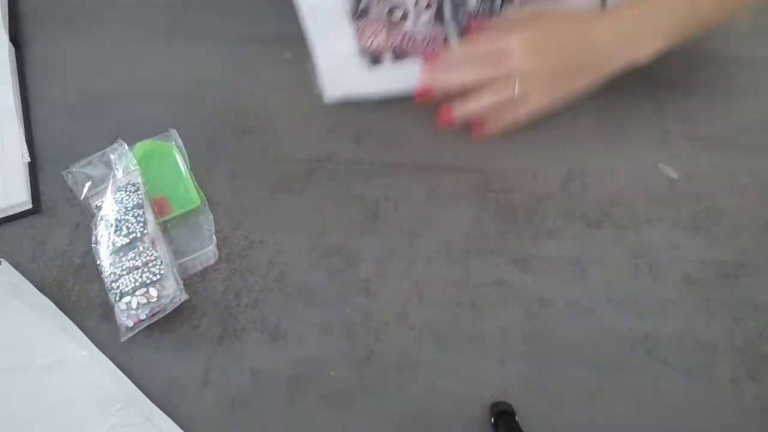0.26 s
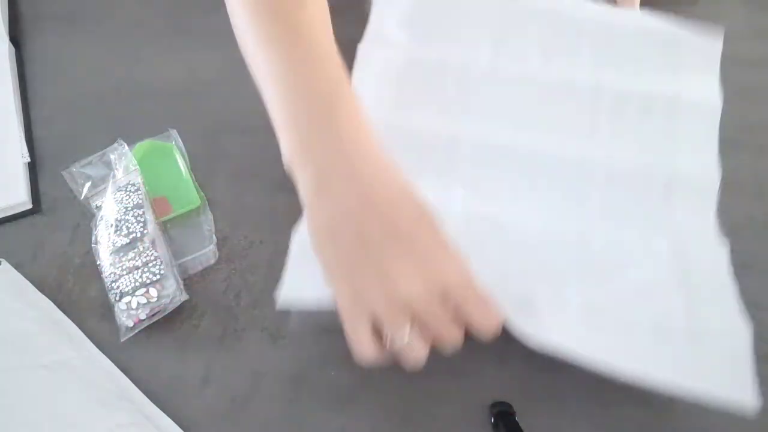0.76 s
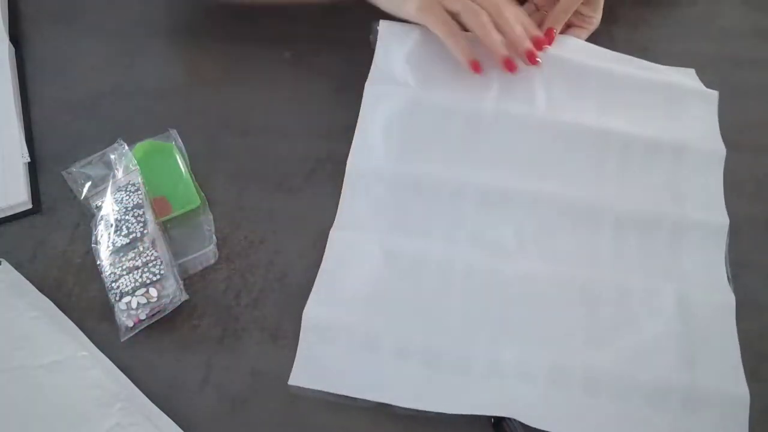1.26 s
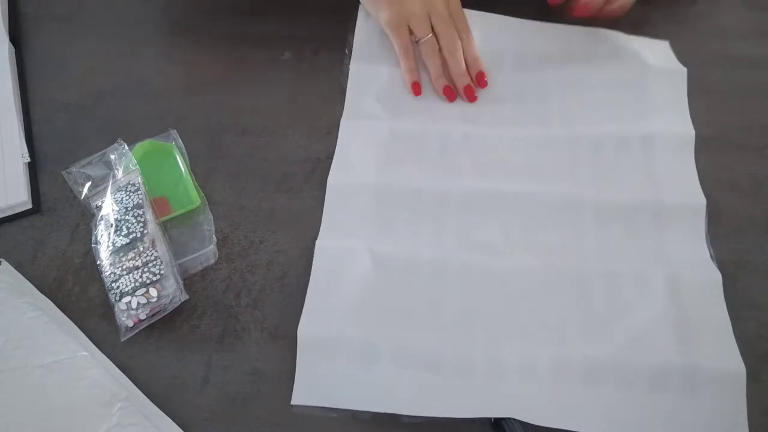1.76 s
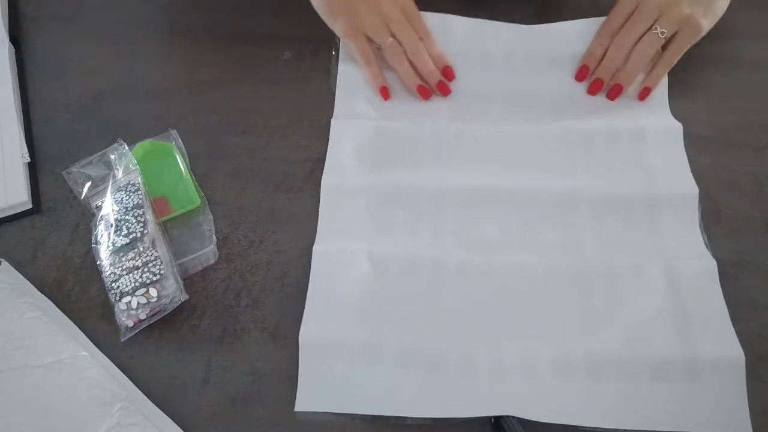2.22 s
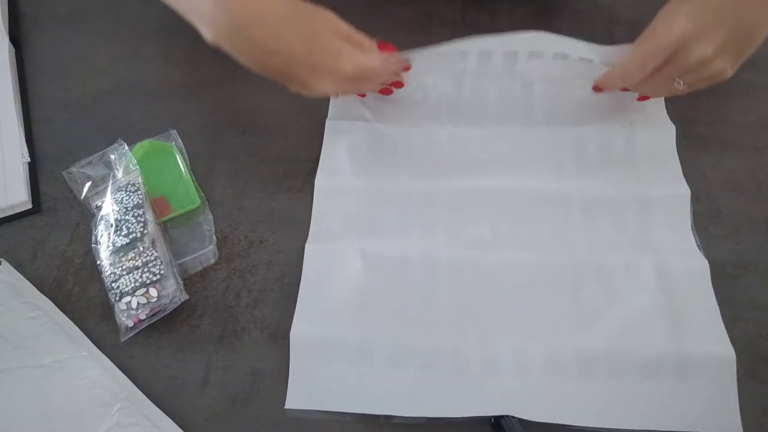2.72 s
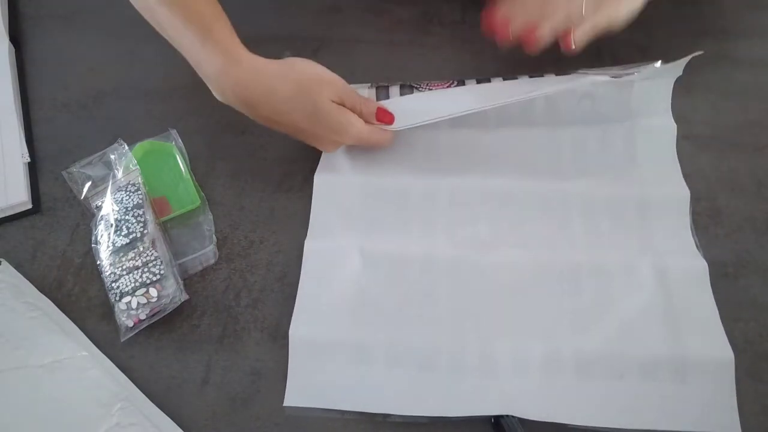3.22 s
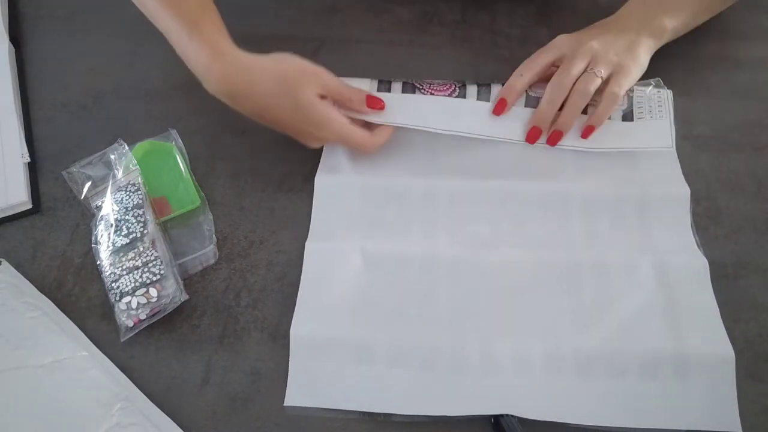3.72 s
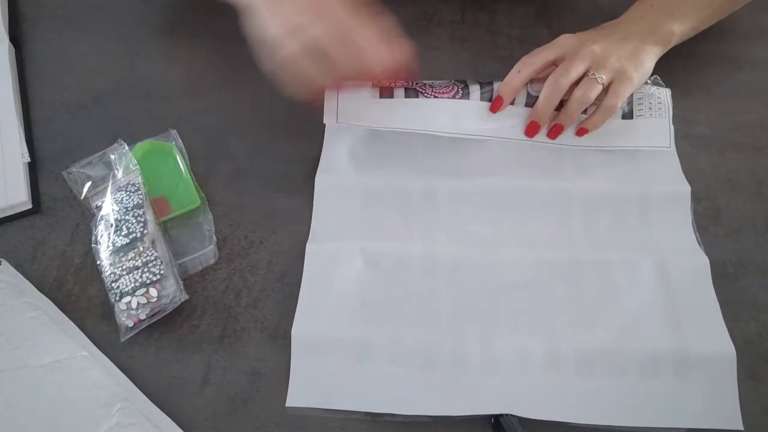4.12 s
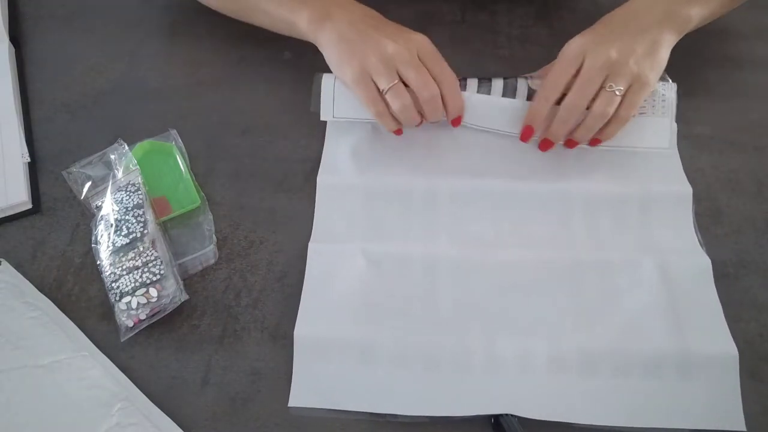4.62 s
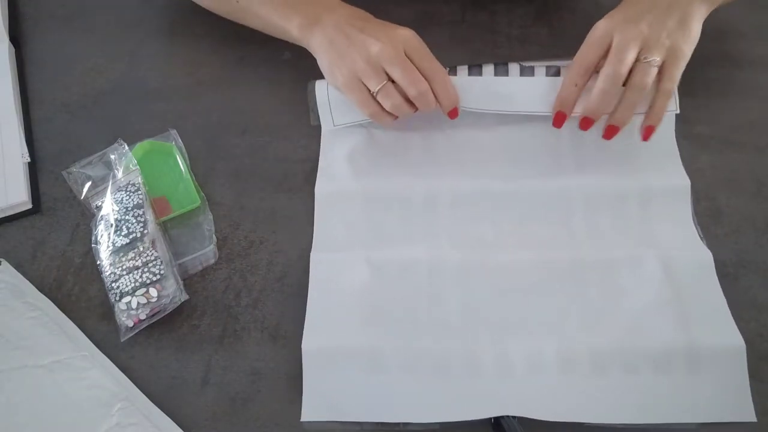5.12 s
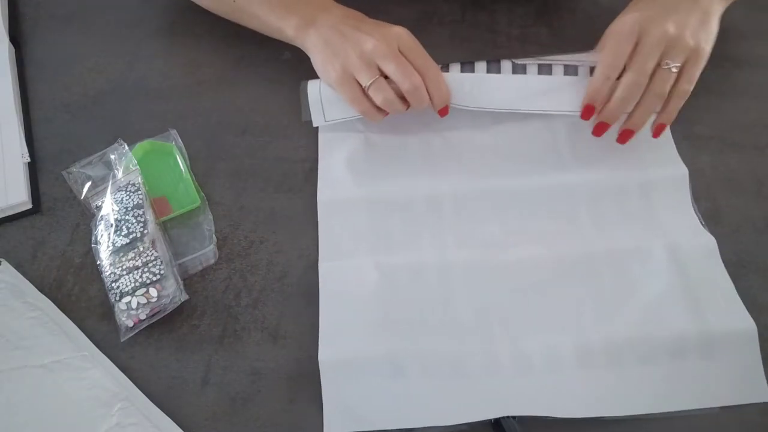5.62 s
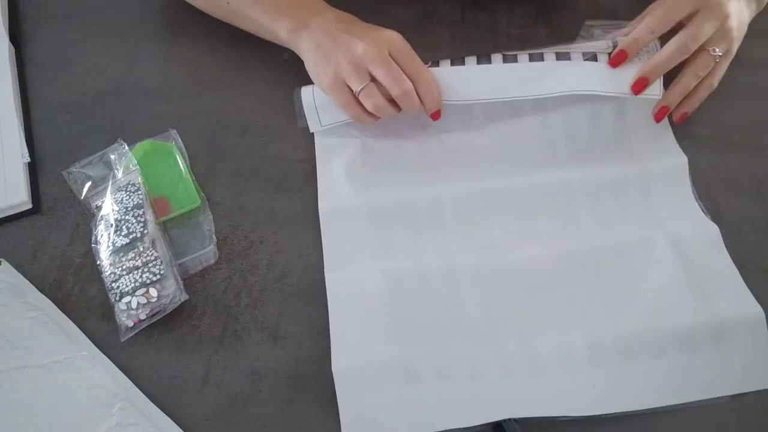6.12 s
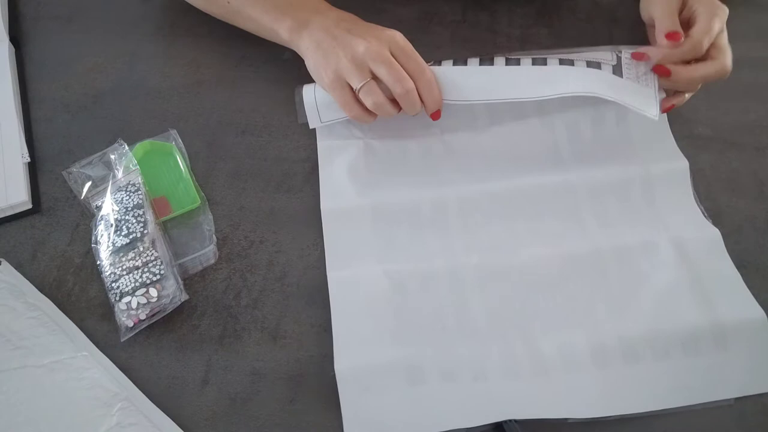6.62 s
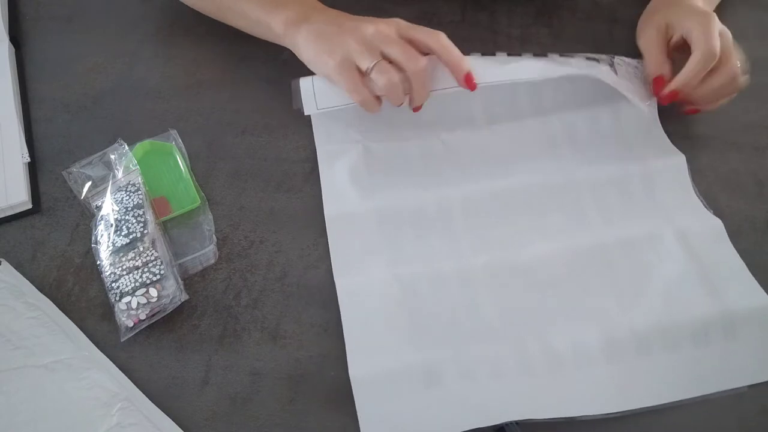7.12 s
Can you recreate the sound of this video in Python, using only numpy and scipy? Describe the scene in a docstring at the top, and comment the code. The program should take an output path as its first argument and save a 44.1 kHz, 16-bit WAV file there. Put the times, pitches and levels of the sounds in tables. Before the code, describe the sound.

A stiff canvas sheet under thin plastic film is handled on a table in a quiet room. It swishes and buckles as it is turned over, then is smoothed with short rubs and scattered crinkles. Film snaps multiply as the edge is rolled, growing sharpest and densest near the end. Two close microphones, bright and dry, with a faint low room murmur.

```python
"""A quiet room: two hands slide, flatten and roll a stiff canvas sheet under a plastic film on a table.
Creases snap as noise bursts around a tick; the film crackles as random grains; rubbing is friction noise.
Air under the sheet resounds as narrow noise bands, knocks add brief sines, and bumps ring the table's modes.
Two close microphone ports hear direct sound, echoes and a low room murmur;
the left port has a sharp treble resonance, the right one a treble dip."""
import sys
import numpy as np
from scipy import signal
from scipy.fft import rfft, irfft
from scipy.io import wavfile

SR = 44100
rng = np.random.default_rng(int(sys.argv[2]) if len(sys.argv) > 2 else 0)


def inscribe(sig):
    """Save sig as 16-bit PCM at rate SR to the path in sys.argv[1].

    A 1-D sig is mono; a 2-D sig holds one channel per row.
    Samples are clipped to [-1, 1] before scaling.
    """
    pcm = np.round(np.clip(np.atleast_2d(sig).T, -1, 1) * 32767)
    wavfile.write(sys.argv[1], SR, pcm.astype(np.int16))


N = 324576   # samples

# radiating bands, in order canvas, low paper, high paper, film: low_hz, high_hz
SHEET_BANDS = [(350, 1200), (1200, 2800), (2800, 6500), (6500, 17500)]
# places on the sheet, as the lead of the right port over the left: lead_samples
SHEET_PLACES = [6, 2.5, -1.5, 6, 4, -1.5]
# the canvas flexes and drags: time_s, level_db (relative)
CANVAS_FLEX = [(0, -54.5), (.28, -67), (.56, -57.5), (.9, -52), (1.2, -63), (1.35, -62), (1.64, -50),
               (1.82, -68.5), (2.02, -55), (2.33, -67), (2.48, -50.5), (2.8, -74), (3.07, -58), (3.22, -90),
               (3.3, -63.5), (3.5, -56.5), (3.67, -68), (4.04, -51), (4.28, -84), (4.5, -57), (4.68, -53.5),
               (5.25, -70), (5.4, -56), (5.7, -67.5), (6.05, -65), (6.25, -64), (6.46, -56), (6.83, -50),
               (7.13, -49), (7.26, -68), (7.36, -60)]
# the canvas buckles: start_s, level_db (relative), pitch_hz, ring_db (ring against level_db)
CANVAS_KNOCKS = [(0.063, -40, 750, -6), (0.141, -31, 1626, -0.5), (0.347, -43, 1280, -9),
                 (0.8, -38.5, 920, 1), (0.857, -32.5, 920, -2), (0.908, -34.5, 1930, -2),
                 (0.929, -28, 890, -6), (0.972, -32, 880, -13), (1.133, -35.5, 885, 3.5),
                 (1.552, -32, 1870, -8), (1.617, -40, 970, 5), (1.851, -32, 403, -5.5),
                 (1.982, -50, 1200, -6), (1.998, -24.5, 1860, -4), (2.166, -38, 1280, -10),
                 (2.744, -32.5, 1710, -4.5), (2.837, -37, 1750, -1), (2.933, -36, 470, -4),
                 (3.276, -27.5, 1860, -1.5), (3.39, -47, 2090, -4), (3.469, -36.5, 770, 0),
                 (3.588, -42.5, 896, -1), (3.847, -42, 1220, -1), (3.899, -38, 711, -8),
                 (3.974, -49, 1490, -6), (4.061, -36, 1460, -6), (4.123, -35, 2300, 1),
                 (4.193, -34.5, 970, -5), (4.334, -37, 940, -1), (4.429, -47, 925, 1),
                 (4.462, -38.5, 1020, 1), (4.481, -33.5, 930, -1), (4.568, -39.5, 1460, -4),
                 (4.656, -34.5, 930, -6), (4.962, -33.5, 1680, -13), (5.008, -39.5, 1730, -6),
                 (5.092, -38, 970, -6), (5.309, -42.5, 934, -9), (5.373, -35.5, 2180, 0),
                 (5.392, -29, 1280, -10), (5.55, -45, 1730, -12), (5.587, -30.5, 2560, -11),
                 (5.764, -38, 794, -2.5), (5.956, -39.5, 1290, -6), (6.294, -46, 746, -2),
                 (6.427, -28.5, 740, -11), (6.45, -27.5, 1510, -13), (6.559, -39, 581, -8),
                 (6.583, -25.5, 2260, -3), (6.919, -35, 974, -13), (6.978, -29, 727, -6),
                 (7.082, -32, 920, -12), (7.138, -26.5, 950, -5.5), (7.232, -28, 2690, -1.5),
                 (7.327, -22, 2750, -0.5)]


def amp(db):
    """Level law: decibels to amplitude ratio."""
    return 10 ** (np.asarray(db) / 20)


def rms_one(x):
    """Normalisation: scale to a root mean square of 1."""
    return x / np.sqrt(np.mean(x ** 2) + 1e-20)


def drift(rate_hz):
    """Low-passed noise: two equal one-pole filters leave a slow random wander of rms 1."""
    r = np.exp(-2 * np.pi * rate_hz / SR)
    noise = rng.standard_normal(N + SR)
    settled = signal.lfilter([1], [1, -2 * r, r * r], noise)[SR:]
    return rms_one(settled)


def band(x, low_hz, high_hz):
    """Band-pass filtering, with a gain that keeps white noise at its rms."""
    sos = signal.butter(2, [low_hz, high_hz], "band", fs=SR, output="sos")
    return signal.sosfilt(sos, x) * np.sqrt(SR / 2 / (high_hz - low_hz))


def colour(x, peaks):
    """Resonance and anti-resonance: second-order sections in series raise or lower regions of the spectrum."""
    for hz, width_hz, db in peaks:
        a = amp(db / 2)
        w = 2 * np.pi * hz / SR
        k = np.tan(np.pi * width_hz / SR)
        numerator = [1 + k * a, -2 * np.cos(w), 1 - k * a]
        denominator = [1 + k / a, -2 * np.cos(w), 1 - k / a]
        x = signal.lfilter(numerator, denominator, x)
    return x


def room_tone(alike):
    """Partly coherent noise: the steady low murmur of the building, with correlation alike between ports."""
    # spectrum of the murmur: frequency_hz, density_db (relative, per Hz)
    murmur = np.array([(15, -22), (27, -6.5), (79, -3.5), (130, -5), (250, -6.5), (420, -12.5),
                       (900, -21.5), (5000, -23.5), (9000, -39)])
    level_db = -62   # rms before the ports colour it
    hz = np.fft.rfftfreq(N, 1 / SR) + 1   # the offset avoids log 0
    gain = amp(np.interp(np.log(hz), np.log(murmur[:, 0]), murmur[:, 1]))
    mid, side = irfft(rfft(rng.standard_normal((2, N))) * gain, N)
    ports = np.sqrt(1 + alike) * mid + np.sqrt(1 - alike) * side * [[1], [-1]]
    return amp(level_db) * rms_one(ports)


def handling():
    """Excitation by the hands: the relative level of each band in time, linear in dB between points."""
    # hands working the sheet: time_s, film_db (crackle), scrape_db (low paper), both relative
    work = [(0, -45, -38), (.07, -55, -55.5), (.16, -38, -49.5), (.28, -61, -66), (.48, -44, -58),
            (.56, -52.5, -59.5), (.71, -46, -50.5), (.83, -52.5, -61), (.95, -51.5, -52), (1.07, -44, -48),
            (1.14, -53, -60), (1.23, -46, -47.5), (1.35, -62, -64.5), (1.45, -46, -49),
            (1.57, -48.5, -50.5), (1.642, -41.5, -38.5), (1.81, -66, -66.5), (1.86, -60, -58),
            (1.95, -62, -68), (2.02, -44.5, -47), (2.14, -51.5, -55), (2.19, -43.5, -42),
            (2.33, -51.5, -58), (2.478, -47, -43.5), (2.71, -61, -68), (2.81, -61.5, -62),
            (2.87, -50.5, -50), (3.07, -52, -65), (3.23, -71, -61), (3.3, -56, -69), (3.37, -54.5, -56.5),
            (3.5, -54.5, -53.5), (3.65, -54, -62), (3.7, -48.5, -59), (4.04, -46.5, -48),
            (4.18, -51.5, -55), (4.29, -66, -70), (4.42, -55, -57.5), (4.48, -59.5, -50),
            (4.62, -54, -58.5), (4.67, -55, -47.5), (4.86, -50, -59.5), (5, -48, -55.5), (5.25, -64, -61),
            (5.4, -37, -52.5), (5.52, -69, -61.5), (5.59, -53, -56), (5.74, -55, -54.5), (5.91, -55.5, -67),
            (6.03, -50, -63), (6.14, -58, -55), (6.26, -64, -72), (6.32, -49, -66), (6.39, -51, -69),
            (6.46, -28.5, -44.5), (6.54, -45, -70), (6.68, -39.5, -45.5), (6.74, -47, -61.5),
            (6.83, -38.5, -48), (6.9, -41.5, -55), (7.031, -47, -53), (7.13, -39, -51),
            (7.25, -41.5, -48.5), (7.3, -47.5, -54.5), (7.36, -44, -49)]
    film_share = 0.49   # the high paper hiss lies between film and scrape
    t = np.arange(N) / SR
    s, film_db, scrape_db = np.transpose(work)
    hiss_db = film_share * film_db + (1 - film_share) * scrape_db
    canvas = np.interp(t, *np.transpose(CANVAS_FLEX))
    others = [np.interp(t, s, level_db) for level_db in (scrape_db, hiss_db, film_db)]
    return np.array([canvas] + others)


def rustle(grains_per_s, spread_db, smooth, clump_db):
    """Stick-slip friction: clumped tiny slips over smooth rubbing noise; places x bands x N.

    The grain rate holds where the clumping gain is 1."""
    # radiated share of each band: trim_db
    radiated = np.array([-3, -2, -2.5, -5.5])
    out = np.zeros((len(SHEET_PLACES), len(SHEET_BANDS), N))
    share = np.array(smooth)[:, None]   # the canvas mostly rubs, the film mostly crackles
    together = drift(30)
    for k in range(len(SHEET_PLACES)):
        clump = amp(clump_db * (0.83 * together + drift(20)))
        born = rng.random(N) < grains_per_s * clump / SR
        sizes = amp(spread_db * np.minimum(rng.exponential(1, N), 4))
        grains = rms_one(born * sizes * rng.choice([-1, 1], N))
        friction = rms_one(clump * rng.standard_normal(N))
        patches = amp(3.2 * np.array([drift(9) for edges in SHEET_BANDS]))   # each band swells on its own
        out[k] = share * patches * friction + np.sqrt(1 - share ** 2) * grains
    return out * amp(handling() + radiated[:, None]) / np.sqrt(len(SHEET_PLACES))


def creases():
    """Spectra of buckling: film snaps and canvas knocks as rows of start_s, a level_db per band, t60_s."""
    # the film snaps: start_s, film_db, tick_db (paper under it), both relative
    film_snaps = [(0.0643, -29, -66), (0.0904, -29, -48), (0.1246, -31, -41), (0.1441, -26, -36),
                  (0.314, -37, -48.5), (0.3481, -34, -48.5), (0.409, -24.5, -65), (0.435, -27.5, -64),
                  (0.4574, -29, -47), (0.557, -33, -70), (0.6414, -30, -60), (0.8608, -31, -38.5),
                  (0.9146, -28.5, -45), (0.9972, -30, -42.5), (1.8527, -27, -51.5), (1.941, -49, -52.5),
                  (1.9806, -27.5, -60), (2.0055, -36, -36.5), (2.0176, -25, -35), (2.069, -31, -45),
                  (2.1685, -23, -49), (2.1842, -28, -40), (2.365, -25.5, -45), (2.3774, -25.5, -49),
                  (2.587, -27, -49), (2.6565, -35, -49), (2.838, -44, -37.5), (2.933, -51, -45),
                  (3.0058, -31.5, -47.5), (3.0839, -41, -46), (3.2783, -29, -38.5), (3.3395, -32, -60),
                  (3.4281, -18, -36), (3.512, -23.5, -50), (3.5936, -38, -46.5), (3.6192, -32, -51),
                  (3.6652, -31, -52), (3.7166, -30, -42.5), (3.7574, -26, -37), (3.8146, -32, -40),
                  (3.9077, -24, -42.5), (3.9523, -19, -42.5), (3.967, -32, -48), (4.0514, -25, -44),
                  (4.0671, -24, -45), (4.1239, -24, -38.5), (4.1923, -34, -43), (4.335, -31, -53),
                  (4.463, -35, -37), (4.4964, -23, -47), (4.5686, -23.5, -45), (4.6054, -30, -48),
                  (4.6165, -28, -62), (4.652, -25, -42.5), (4.7666, -29, -50), (4.812, -52, -45),
                  (4.84, -29.5, -56), (4.9076, -26.5, -45), (4.962, -30.5, -43.5), (5.2803, -41, -48),
                  (5.3153, -38, -42.5), (5.3742, -27, -52), (5.4106, -17, -42.5), (5.5842, -28.5, -47),
                  (5.6575, -21, -45), (5.7394, -31, -57), (5.7635, -25, -40.5), (5.8302, -27.5, -46.5),
                  (5.8863, -33, -47.5), (5.9312, -30.5, -57), (6.0396, -43, -53), (6.057, -37, -60),
                  (6.1529, -54, -44), (6.215, -39, -69), (6.2964, -23, -46.5), (6.3046, -17, -42),
                  (6.3294, -32, -49), (6.381, -54.5, -45), (6.408, -30, -50), (6.427, -37, -41),
                  (6.4504, -17.5, -34), (6.5106, -20.5, -49), (6.559, -32, -43.5), (6.5786, -25, -46),
                  (6.5853, -13, -32.5), (6.6148, -36, -44), (6.6384, -16.5, -55), (6.6615, -26, -38),
                  (6.6771, -16.5, -37.5), (6.6903, -17.5, -36), (6.7582, -38, -42), (6.773, -22, -47),
                  (6.785, -21, -45), (6.811, -27, -48), (6.8294, -18, -38), (6.8527, -27, -54),
                  (6.9261, -24, -42.5), (6.9352, -21, -41), (6.98, -18.5, -51), (7.0986, -24, -39),
                  (7.1397, -19.5, -58), (7.1944, -45, -64), (7.235, -16.5, -48), (7.319, -32, -59),
                  (7.3307, -32, -53)]
    film_trim_db, film_t60_s = -16, 0.02
    tick_trim_db = 0.5 - 11 * np.array([2, 1, 0])   # canvas, low and high paper: 11 dB less per band down
    knock_trim_db, knock_t60_s = -10.5, 0.026
    fall_db_per_octave = 7   # away from the knock's pitch
    centres_hz = np.sqrt(np.prod(SHEET_BANDS, axis=1))
    rows = []
    for s, film_db, tick_db in film_snaps:
        rows.append((s, *(tick_db + tick_trim_db), film_db + film_trim_db, film_t60_s))
    for s, db, pitch_hz, ring_db in CANVAS_KNOCKS:
        octaves_away = np.abs(np.log2(centres_hz / pitch_hz))
        rows.append((s, *(db + knock_trim_db - fall_db_per_octave * octaves_away), knock_t60_s))
    return rows


def snaps(tick, creak_s):
    """Sudden release of strain: a crease creaks, lets go with a tick, sprays smaller slips; places x bands x N."""
    length, lead_in = 4096, 256   # samples of each burst, and of them before the tick
    out = np.zeros((len(SHEET_PLACES), len(SHEET_BANDS), N + length))
    t = (np.arange(length) - lead_in) / SR
    for s, *levels_db, t60_s in creases():
        envelope = np.where(t < 0, np.exp(t / creak_s), amp(-60 * t / t60_s))
        burst = rng.standard_normal(length) ** 3 / 4 * envelope   # few strong slips, many weak ones
        burst[lead_in] = tick
        burst *= np.sqrt(.008 * SR / np.sum(burst ** 2))   # energy of unit rms over 8 ms
        at = round(s * SR)
        place = rng.integers(len(SHEET_PLACES))
        out[place, :, at:at + length] += amp(levels_db)[:, None] * burst
    return out[..., lead_in:N + lead_in]


def hollow():
    """Cavity resonance: rubbing noise in the air under the lifted sheet, and a decaying sine for each knock."""
    # the air pocket resounds: time_s, level_db (relative)
    pocket_level = [(0, -85), (.45, -91), (.57, -64), (.7, -56.5), (.85, -50.5), (1.0, -63), (1.2, -65),
                    (1.35, -60), (1.45, -62.5), (1.65, -71), (1.78, -90), (3.95, -87), (4.2, -60),
                    (4.3, -60.5), (4.5, -68), (4.72, -58), (4.9, -77), (6.5, -95), (6.85, -83),
                    (7.15, -47.5), (7.36, -75)]
    # resonances of the pocket: centre_hz, width_hz, gain_db
    pocket_modes = [(740, 130, -8.5), (940, 120, -3)]
    ring_t60_s = .03
    rings, t = np.zeros(N + 4096), np.arange(4096) / SR
    for s, db, pitch_hz, ring_db in CANVAS_KNOCKS:
        decay = amp(db + ring_db - 60 * t / ring_t60_s)
        rings[round(s * SR):][:4096] += decay * np.sin(2 * np.pi * pitch_hz * t)
    level = amp(np.interp(np.arange(N) / SR, *np.transpose(pocket_level)))
    air = np.zeros(N)
    for hz, width_hz, db in pocket_modes:
        noise = band(rng.standard_normal(N), hz - width_hz / 2, hz + width_hz / 2)
        air += amp(db + 4.8 * drift(25)) * noise
    return rings[:N] + level * air


def bumps():
    """Modal vibration: pushes ring the table top, harder ones favour upper modes; the dragged canvas shakes it."""
    # hands on the table: start_s, level_db (relative), hardness_db_per_octave
    pushes = [(0.423, -54.5, -10), (0.631, -53, -5), (1.393, -47.5, -4), (1.609, -55.5, -13),
              (1.701, -50.5, -1), (1.842, -52.5, -5), (4.387, -57, -3), (4.462, -51.5, -1.5),
              (4.681, -44.5, -3), (4.87, -63, 3), (5.378, -52, -1.5), (6.574, -63, -18), (6.778, -64, 13)]
    # modes of the table top: frequency_hz, level_db (relative), t60_s
    table_modes = [(77.3, -1.5, 0.41), (109, 1, 0.25), (151, 2, 0.14), (217.4, 7, 0.23), (322, 3.5, 0.06),
                   (410, 3, 0.3)]
    s, push_db, hardness = np.transpose(pushes)
    drag_db = np.interp(np.arange(N) / SR, *np.transpose(CANVAS_FLEX)) - 53.5
    drag = amp(drag_db) * rng.standard_normal(N)
    out = np.zeros(N)
    for hz, level_db, t60_s in table_modes:
        force = amp(level_db) * drag
        force[(s * SR).astype(int)] += amp(push_db + level_db - 9 + hardness * np.log2(hz / 150))
        r = amp(-60 / (t60_s * SR))   # decay per sample
        w = 2 * np.pi * hz / SR
        out += signal.lfilter([0, np.sin(w)], [1, -2 * r * np.cos(w), r * r], force)
    return out


def echoes(lead, near_db, near_t60, room_db, room_t60, alike_hz):
    """Reverberation: direct sound, quick echoes off table and hands, a room tail; the lows reach both ports alike.

    The direct sound is centred on sample 8; decay times are in seconds."""
    t = np.arange(SR // 3) / SR
    envelope = amp(near_db - 60 * t / near_t60) + amp(room_db - 60 * t / room_t60)
    shared, *own = rng.standard_normal((3, len(t)))
    differing = signal.lfilter(*signal.butter(1, alike_hz, "high", fs=SR), np.array(own) - shared)
    reflected = envelope * (shared + differing) * (t > .0006)
    arrival = np.arange(len(t)) - 8 - np.array([[lead / 2], [-lead / 2]])
    direct = np.sinc(arrival) * (np.abs(arrival) < 8)   # fractional delay
    return reflected + direct


def scene():
    """Superposition: each place on the sheet radiates its bands and reaches the ports by its own path."""
    # air under the sheet: centre_hz, width_hz, gain_db
    sheet_air = [(714, 48, 1.5), (914, 140, 3), (1084, 55, -6), (1330, 220, -2), (2490, 800, -3)]
    slips = rustle(grains_per_s=250, spread_db=8.0, smooth=[0.91, 0.75, 0.83, 0.2], clump_db=4.0)
    slips += snaps(tick=11.2, creak_s=0.0006)
    # neighbouring bands alternate in sign so that they join without a dip
    radiated = sum((-1) ** b * band(slips[:, b], *edges) for b, edges in enumerate(SHEET_BANDS))
    sheet = colour(radiated, sheet_air)
    sheet[0] += hollow()   # the pocket lies at the first place
    out = room_tone(alike=0.33) + bumps()
    for sound, lead in zip(sheet, SHEET_PLACES):
        path = echoes(lead, near_db=-23, near_t60=0.047, room_db=-39.5, room_t60=0.51, alike_hz=1330)
        heard = signal.fftconvolve(sound[None], path, axes=1)[:, 8:N + 8]
        out = out + amp(-4.0) * heard
    return out


def record(dry):
    """Linear filtering: each port has its own resonances; the top falls in a 16 dB step, then is cut."""
    # left port: centre_hz, width_hz, gain_db
    left_port = [(5800, 5000, -8), (8280, 1960, 15), (9410, 2150, 6.5)]
    # right port: centre_hz, width_hz, gain_db
    right_port = [(6350, 850, 10), (7540, 3200, -13.5), (9550, 1600, 1), (13900, 820, 6)]
    step_hz, stop_hz = 15750, 16990   # the cut reaches 60 dB at stop_hz
    ports = np.array([colour(dry[0], left_port), colour(dry[1], right_port)])
    # filtering both ways keeps the phase, so the rest above the step is the plain difference
    below = signal.sosfiltfilt(signal.cheby1(10, .3, step_hz, fs=SR, output="sos"), ports)
    stepped = below + amp(-16) * (ports - below)
    return signal.sosfilt(signal.cheby2(18, 60, stop_hz, fs=SR, output="sos"), stepped)


dry = scene()
out = record(dry)
inscribe(out)
```